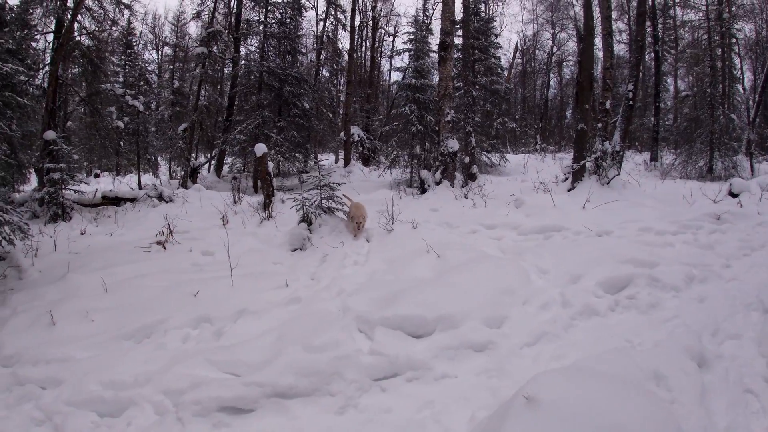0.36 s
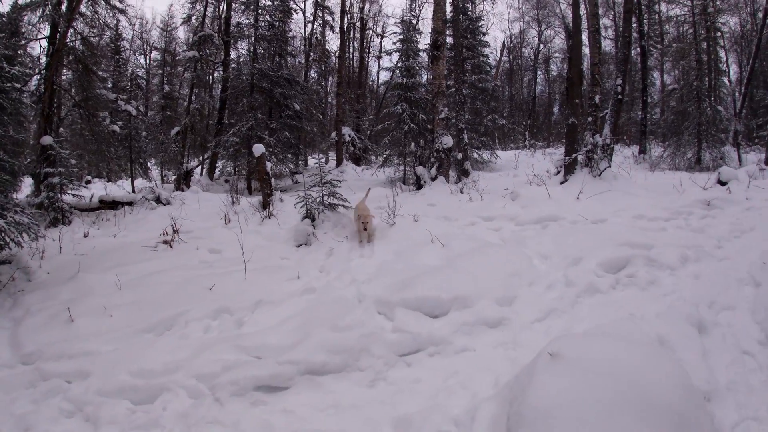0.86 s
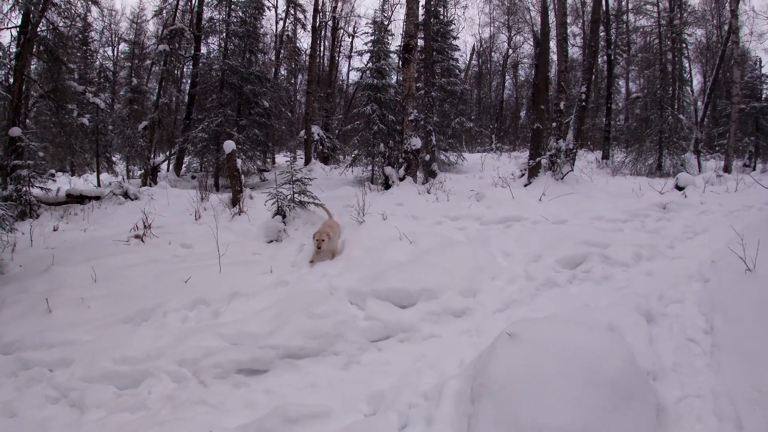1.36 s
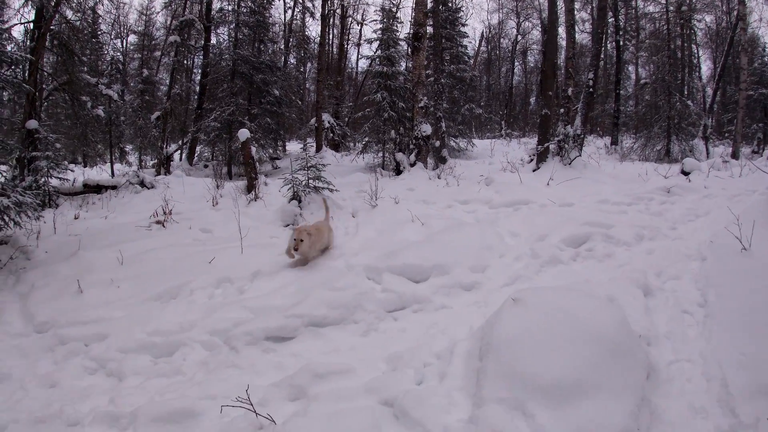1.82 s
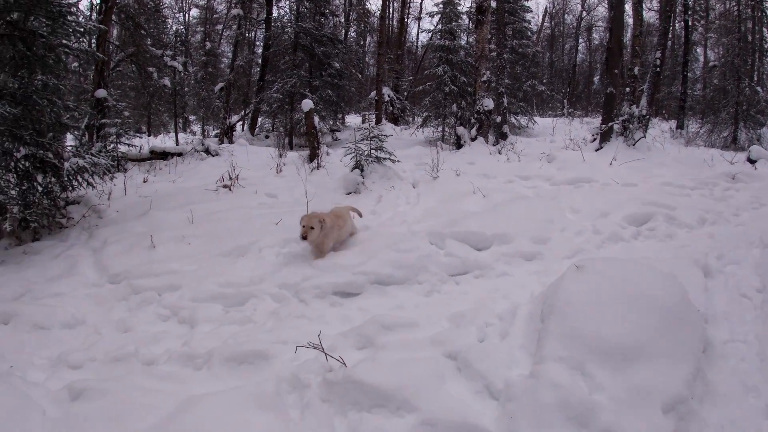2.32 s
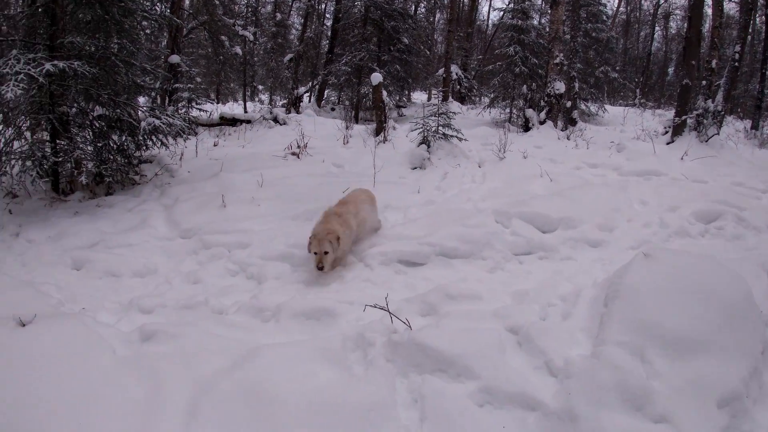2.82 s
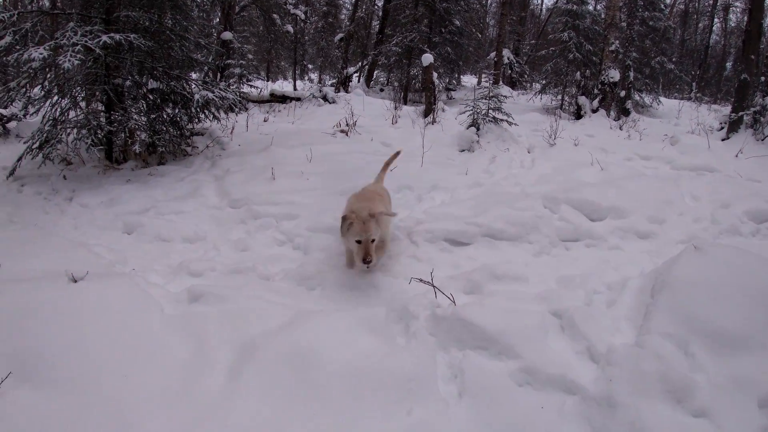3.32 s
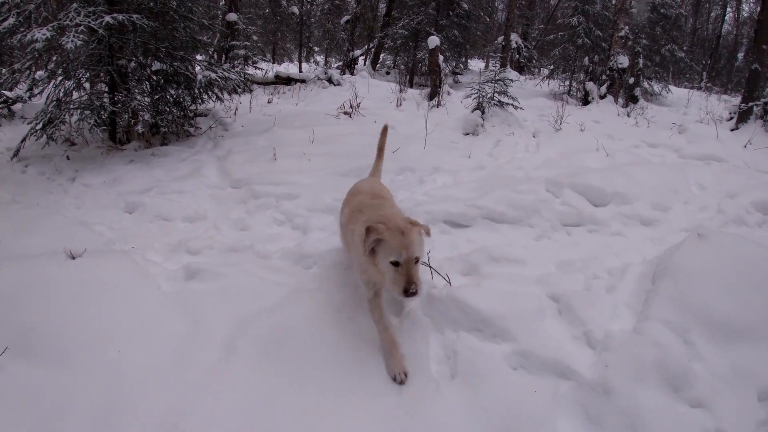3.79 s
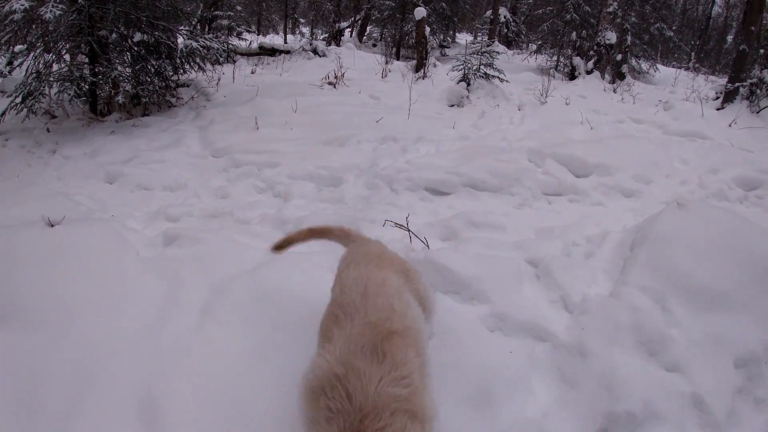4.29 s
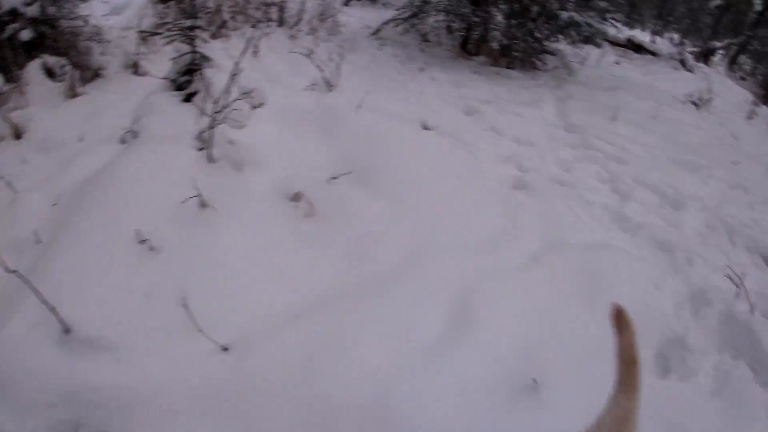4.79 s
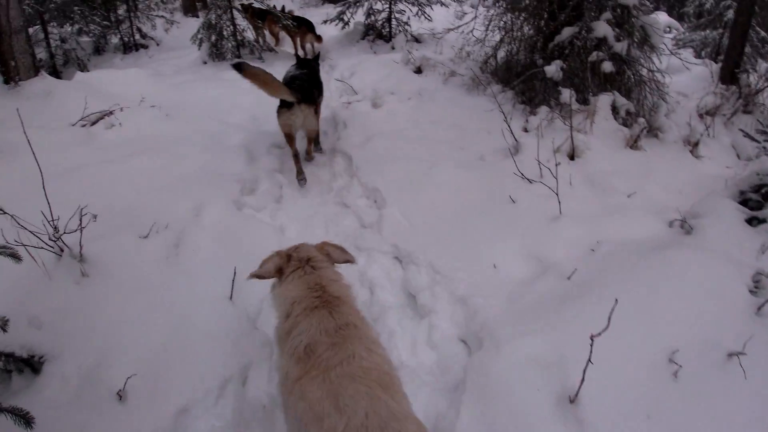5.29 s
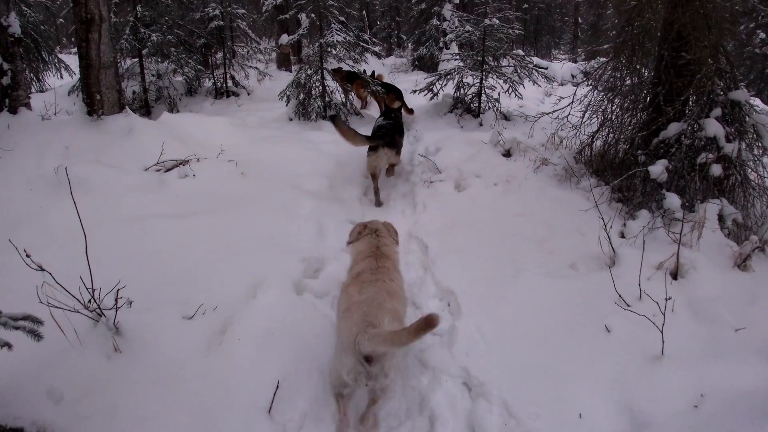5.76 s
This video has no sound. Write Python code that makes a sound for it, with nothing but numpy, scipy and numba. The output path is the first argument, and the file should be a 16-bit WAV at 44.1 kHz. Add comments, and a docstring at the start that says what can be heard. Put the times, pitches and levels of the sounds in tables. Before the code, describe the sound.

Fine snow hiss and a few crunching steps open the scene, followed quickly by two sharp yelps, the first tonal and higher, the second rising and falling. Then dogs bound through powder: gritty crunches, hollow low thuds and small crisp crackles, densest as one passes the microphone. The outdoor space is dry with barely any echo; handling jolts and soft low gusts rumble underneath.

```python
"""Snowy forest: a dog barks twice close to a hand-held camera; its collar tag ticks.
The bark is a voiced source ringing a throat; the tag is a few decaying sines.
Dogs bound through deep powder: snow hisses and crunches as shaped random grains, twigs snap,
paws and camera jolts thump as decaying sines, gusts of low noise buffet the microphone."""
import sys
import numpy as np
from scipy import signal
from scipy.fft import rfft, irfft, next_fast_len
from scipy.io import wavfile
from scipy.ndimage import uniform_filter1d
from numba import njit

SR = 44100
rng = np.random.default_rng(int(sys.argv[2]) if len(sys.argv) > 2 else 0)


def int16_out(signal):
    """Quantize to a 16-bit WAV file."""
    q = np.round(np.clip(np.atleast_2d(signal).T, -1, 1) * 32767)
    wavfile.write(sys.argv[1], SR, q.astype(np.int16))


def invert_db(level):
    """Linear amplitude ratio for a level in decibels (20 dB per decade), elementwise."""
    return 10 ** (np.asarray(level, dtype=float) / 20)


N = 259749
T = np.arange(N) / SR


def curve(table):
    """Columns of a table joined by straight lines in time."""
    s, *columns = np.transpose(table)
    return [np.interp(T, s, c) for c in columns]


def colour(x, points):
    """Shape by (f/Hz, level/dB) points, 30 dB lower beyond them; unit white noise comes out near rms 1."""
    below = (points[0][0] / 2, points[0][1] - 30)
    above = (points[-1][0] * 1.34, points[-1][1] - 30)
    hz, db = np.transpose([below] + points + [above])
    size = next_fast_len(N)
    bin_hz = np.arange(size // 2 + 1) * SR / size
    gain = invert_db(np.interp(np.log(bin_hz + 1), np.log(hz), db))
    return irfft(rfft(x, size) * gain / np.sqrt(np.mean(gain ** 2)), size)[:N]


def band(x, hz, width_hz):
    """One resonance, gain 1 at its centre."""
    return signal.lfilter(*signal.iirpeak(hz, hz / width_hz, fs=SR), x)


@njit
def glide(x, hz, width_hz):
    """State-variable band-pass whose centre moves, gain 1 at the centre."""
    y, b, l = np.empty(len(x)), 0., 0.
    for i in range(len(x)):
        g, k = np.tan(np.pi * hz[i] / SR), width_hz / hz[i]
        v = (b + g * (x[i] - l)) / (1 + g * (g + k))
        b, l, y[i] = 2 * v - b, l + 2 * g * v, k * v
    return y


def walk(rate_hz):
    """Random levels drawn every 1 / rate_hz s and slewed; spread near 1."""
    k = int(SR / rate_hz)
    return 1.25 * uniform_filter1d(np.repeat(rng.standard_normal(N // k + 1), k), k)[:N]


def grains(rate_hz, spread_db):
    """Crystals snapping: noise whose size jumps at random, now and then far up; rms 1."""
    k = max(int(SR / rate_hz), 1)
    noise = rng.standard_normal(N)
    jumps = np.minimum(rng.exponential(size=N // k + 1), 4)
    x = noise * invert_db(spread_db * np.repeat(jumps, k)[:N])
    return x / np.sqrt(np.mean(x ** 2))


def add(out, s, sound):
    """Mix a short sound in at time s."""
    i = max(int(s * SR), 0)
    out[i:i + len(sound)] += sound[:N - i]


def bark():
    """A clear fundamental; above it uneven, strong-weak pulses and a puff of air per cycle ring the throat."""
    # voice: t/s, mean pitch f/Hz, fundamental rms level/dB, overtone drive level/dB
    voice_track = [(.604, 210.6, -31.5, -43), (.618, 234, -23.5, -40.5), (.636, 450.8, -32.5, -22),
                   (.648, 500, -13.5, -28.5), (.665, 541.9, -10.5, -20), (.697, 510.8, -10, -18.5),
                   (.722, 450.8, -27, -18), (.745, 418.2, -16.5, -20.5), (.762, 391.3, -17, -30),
                   (.78, 280.9, -36.5, -39), (.815, 210.6, -35, -30.5), (.85, 218.7, -41.5, -24.5),
                   (.868, 276.7, -28, -22.5), (.888, 327.8, -23.5, -17.5), (.905, 387.7, -15, -14),
                   (.925, 419.6, -14.5, -15.5), (.946, 457.8, -13, -23), (.985, 385.5, -21.5, -23.5),
                   (1.002, 318.4, -27.5, -25.5), (1.02, 234.2, -33.5, -74.5), (1.07, 142, -55, -61)]
    # second, lower vibration of the folds in the first bark: t/s, f/Hz, rms level/dB
    undertone = [(.645, 249, -43), (.66, 262, -24), (.68, 334, -25), (.725, 412, -37)]
    # throat resonances: f/Hz before mouth factor, nominal width/Hz (scaled below), relative level/dB
    throat = [(449, 69, 7.5), (830, 148, -1.5), (1300, 350, -23.5), (1920, 110, -31)]
    # each bark: t/s of hoarsest moment, nominal roughness/0-1, half-pitch share/0-1 at the top pitch,
    # mouth opening/factor on the throat f
    manner = [(.604, 0.77, 0.2, 1.11), (.86, 0.31, 0.9, 0.97)]
    # dips of the fundamental: t/s, half length/s, depth level/dB
    voice_breaks = [(.675, .004, -20), (.713, .008, -18)]
    mouth_reset_s, settle_s, top_pitch_hz = 0.73, 0.14, 480

    hz, tone_db, db = curve(voice_track)
    which = (T >= mouth_reset_s).astype(int)
    hoarsest_s, rough, half, mouth = np.transpose(manner)[:, which]
    tone_db = tone_db + sum(d * np.exp(-((T - s) / w) ** 2) for s, w, d in voice_breaks)
    rough = np.clip(rough * (0.29 + 0.88 * np.exp(-np.abs(T - hoarsest_s) / settle_s)), 0, 1)
    half = half * np.minimum(hz / top_pitch_hz, 1) ** 2
    mouth = uniform_filter1d(mouth, size=500)
    on = np.clip(np.minimum(T - voice_track[0][0], voice_track[-1][0] - T) / 0.0056, 0, 1)

    cycles = np.cumsum(hz * (1 + 0.04 * rough * walk(200))) / SR
    pulses = sum(np.cos(2 * np.pi * k * cycles) * k ** -.3 for k in range(2, 14))
    # every other pulse is weaker; sizes also wander
    size = (1 + half * np.cos(np.pi * cycles)) * (1 + 0.52 * rough * walk(250))
    air = 7.5 * rough * (1 + np.cos(2 * np.pi * cycles)) * rng.standard_normal(N)
    source = invert_db(db) * on * (pulses * size + air)

    voice = np.zeros(N)
    for k, (f, width_hz, level_db) in enumerate(throat):
        once = glide(source, f * mouth, 1.14 * width_hz)
        voice += (-1) ** k * invert_db(level_db) * glide(once, f * mouth, 2.8 * width_hz)

    low_hz, low_db = curve(undertone)
    low_on = np.clip(np.minimum(T - undertone[0][0], undertone[-1][0] - T) / .008, 0, 1)
    low = invert_db(low_db) * np.sin(2 * np.pi * np.cumsum(low_hz) / SR) * low_on
    tone = on * invert_db(tone_db) * np.sin(2 * np.pi * cycles)
    direct = np.sqrt(2) * (voice + tone + low)

    # snow-laden trunks return a faint, short smear
    t = T[:SR // 4]
    trunks = rng.standard_normal(len(t)) * np.exp(-np.log(1000) * t / 0.35) * (t > .012)
    return direct + invert_db(-43.5) * signal.fftconvolve(direct, trunks)[:N]


def tag():
    """The metal tag's modes ring briefly at each tick."""
    # ticks: t/s, relative level/dB
    ticks = [(0.8525, -21.5), (0.8643, -29), (1.054, -31.5)]
    # modes: f/Hz, relative level/dB, t60/s
    modes = [(5930, -11, 0.029), (7580, 2.5, 0.01), (8500, -20, 0.017)]
    out, t = np.zeros(N), T[:SR // 16]
    ring = sum(invert_db(db) * np.sin(2 * np.pi * f * t) * np.exp(-np.log(1000) * t / t60) for f, db, t60 in modes)
    for s, db in ticks:
        add(out, s, invert_db(db) * 1.05 * ring)
    return out


def snow():
    """Fine and coarse grains, swelling with the ploughing and bursting while a crust gives way."""
    # dogs ploughing powder: t/s, nominal hiss level/dB, weight/dB (deep snow moved; lifts crumble, rumble)
    plough = [(0, -46, 4.5), (.16, -58.5, 7), (.35, -56.5, 8.5), (.6, -55, 10), (.7, -57, 16.5),
              (.85, -52, 11), (1.05, -56, 6), (1.25, -57.5, 15.5), (1.36, -58, 12), (1.55, -56, 2),
              (1.8, -55, 6), (2, -52.5, 5.5), (2.25, -57.5, 3), (2.7, -55, -0.5), (3.3, -52.5, -9),
              (3.38, -61.5, 0.5), (3.55, -63.5, 1.5), (3.68, -51.5, 0), (3.77, -63.5, 10), (3.85, -59, -11),
              (4.05, -54, 1), (4.5, -56.5, 12.5), (4.75, -56, -4.5), (4.96, -50.5, 6), (5.15, -59.5, 5),
              (5.45, -57.5, 5), (5.62, -55.5, -6), (5.89, -58, 17)]
    # camera turning towards the dogs: t/s, lift of the bright peak level/dB
    camera_turn = [(0, -25), (.25, -36), (.5, -15), (.95, 0.5), (1.6, 3.5), (2.4, 12.5), (3.2, 5.5),
                   (3.5, 2.5), (4.2, 7), (5.89, 8)]
    # crunches: t/s, length/s, fine-grain drive level/dB, coarse relative to fine level/dB
    crunches = [(0.004, 0.0322, -40, 1.5), (0.068, 0.028, -47, 6), (0.21, 0.014, -56.5, 10.5),
                (0.276, 0.018, -46, 3.5), (0.332, 0.057, -46.5, -4.5), (0.383, 0.022, -39, -1.5),
                (0.429, 0.017, -44, 9), (0.481, 0.01, -45, -5), (0.507, 0.012, -47, 2.5),
                (0.543, 0.069, -45.5, 8.5), (0.601, 0.02, -45, -2), (0.825, 0.065, -49.5, -16),
                (0.965, 0.013, -47.5, -13), (1.065, 0.0046, -45.5, -17), (1.122, 0.051, -50.5, 7),
                (1.183, 0.016, -55.5, 11), (1.335, 0.011, -53, 11), (1.494, 0.0039, -46, 11.5),
                (1.544, 0.069, -51.5, -9), (1.678, 0.0033, -53.5, -20.0), (1.744, 0.015, -52, 12),
                (1.772, 0.012, -49, 10), (1.825, 0.024, -46.5, -6), (1.846, 0.04, -40, 4),
                (1.889, 0.036, -46.5, 5.5), (1.949, 0.049, -46, 5.5), (2.017, 0.0054, -37.5, -6),
                (2.019, 0.11, -52, 10.5), (2.048, 0.064, -45, 3), (2.253, 0.036, -49.5, 1.5),
                (2.344, 0.1, -44, 2.5), (2.366, 0.012, -44, -10), (2.382, 0.0057, -33, -4.5),
                (2.461, 0.0088, -49, 3), (2.517, 0.0071, -43, -2), (2.618, 0.0078, -34.5, 3),
                (2.655, 0.014, -45, -3), (2.699, 0.0056, -30, -6.5), (2.704, 0.071, -46.5, -2),
                (2.924, 0.026, -37, -9.5), (2.946, 0.042, -46, -2), (2.993, 0.087, -40, -3),
                (3.129, 0.047, -48, -13), (3.133, 0.0062, -33.5, -9), (3.224, 0.015, -45.5, -1.5),
                (3.244, 0.039, -42.5, -3), (3.561, 0.004, -46, -14), (3.591, 0.0046, -43.5, -11),
                (3.614, 0.042, -44, 0), (3.644, 0.008, -36.5, 3.5), (3.857, 0.034, -48, 2),
                (3.897, 0.13, -48.5, 0.5), (3.911, 0.0034, -27.5, -0.5), (3.935, 0.044, -35, -2),
                (3.94, 0.0031, -20.5, -2), (3.984, 0.005, -29.5, -3), (3.996, 0.0061, -29, 4.5),
                (4.02, 0.055, -47.5, -1), (4.2, 0.047, -40, 1.5), (4.208, 0.0078, -25.5, -3),
                (4.255, 0.083, -48.5, 1), (4.325, 0.018, -49, 5), (4.441, 0.013, -58, -6),
                (4.443, 0.011, -39.5, 5.5), (4.503, 0.038, -41.5, -6), (4.551, 0.08, -44, 3),
                (4.574, 0.012, -36.5, 6), (4.62, 0.0095, -38.5, 11), (4.623, 0.077, -53, 7),
                (4.745, 0.046, -40, -11.5), (4.796, 0.014, -42.5, -11), (4.875, 0.05, -43.5, 1.5),
                (4.92, 0.017, -43, -2), (5.047, 0.0027, -39.5, -17), (5.12, 0.097, -50.5, -19),
                (5.156, 0.0051, -31, 2), (5.201, 0.0083, -31, 3), (5.221, 0.021, -47.5, 3),
                (5.266, 0.01, -52, 4), (5.305, 0.023, -48.5, 5), (5.349, 0.13, -48, -6.5),
                (5.396, 0.009, -44, 3), (5.449, 0.032, -46, 2.5), (5.579, 0.027, -47.5, -5),
                (5.676, 0.048, -42, 2.5), (5.688, 0.01, -31.5, -6), (5.7, 0.12, -45, 4.5),
                (5.784, 0.002, -35.5, -4), (5.834, 0.05, -41.5, 4.5)]
    # fine-grain spectrum: f/Hz, relative level/dB
    fine_spectrum = [(1800, 3), (2500, 4), (4000, 3.5), (5200, 1.5), (7000, 1), (9000, -2), (11000, -9.5),
                     (14000, -19.5), (15700, -24)]
    # coarse-grain spectrum: f/Hz, relative level/dB
    coarse_spectrum = [(300, 0), (450, 0), (800, -3), (1300, -4.5), (2000, -12), (2600, -18)]
    crack_rise_s = .0011

    (hiss_db, weight_db), (bright_db,) = curve(plough), curve(camera_turn)
    crumble_db = hiss_db + 2 + 0.52 * weight_db
    rumble_db = hiss_db + 1 + weight_db
    # power envelopes
    fine = invert_db(hiss_db + 2.1 * walk(60)) ** 2
    coarse = invert_db(crumble_db + 2.5 * walk(45)) ** 2
    # crystals let go in clusters, which shakes both sizes of grain together
    clusters = invert_db(2.6 * walk(200))
    fine, coarse = fine * clusters ** 2, coarse * clusters ** 2

    for s, length_s, db, coarse_db in crunches:
        t = T[:int((max(length_s, .003) + .02) * SR)]
        burst = (1 - np.exp(-t / crack_rise_s)) * np.exp(-t / 0.33)
        # the crust stops fast, loose crystals trickle after
        after = np.clip(t - length_s, 0, 1)
        burst = burst * (0.66 * np.exp(-after / 0.00072) + 0.19 * np.exp(-after / 0.0087))
        # a short crack is one cluster, a long one many
        burst = burst * np.resize(clusters[int(s * SR):], len(t)) ** min(length_s / 0.11, 1)
        add(fine, s, (invert_db(db) * burst) ** 2)
        add(coarse, s, (invert_db(db + coarse_db) * burst) ** 2)

    hiss = colour(np.sqrt(fine) * grains(2500, 3.22), fine_spectrum)
    # the hiss flickers in colour: four bands wander independently in level
    hiss = hiss + sum((invert_db(3.17 * walk(70)) - 1) * band(hiss, hz, 0.086 * hz)
                      for hz in (2780, 5160, 9700, 13000))
    # the camera housing lifts or shades a band near 7 kHz as it turns
    hiss = hiss + (invert_db(bright_db) - 1) * band(hiss, 7160, 1170)
    shade_db = np.minimum(bright_db, 0)
    hiss = hiss + (invert_db(.4 * shade_db) - 1) * band(hiss, 5700, 2600)
    # and, with the dogs behind it, favours the middle
    hiss = hiss + (invert_db(-.15 * shade_db) - 1) * band(hiss, 2100, 2100)

    crumble = colour(np.sqrt(coarse) * grains(900, 1.5), coarse_spectrum)
    lumps_db = 3.2 * walk(50)
    low_noise = colour(rng.standard_normal(N), [(140, 5.0), (180, 7.5), (300, 1), (420, -23.0)])
    rumble = invert_db(rumble_db + lumps_db) * low_noise
    return hiss + crumble + rumble


def paws():
    """Landings pack the snow and jolts shake the camera: short hollow thumps that sag in pitch."""
    # paw landings: t/s, relative level/dB, settled f/Hz
    landings = [(0.032, -31.5, 345), (0.071, -29, 140), (0.209, -33, 119), (0.277, -40, 183),
                (0.383, -37, 194), (0.545, -30, 196), (1.161, -30, 187.6), (1.249, -24.5, 153),
                (1.546, -35, 157), (1.747, -41, 328), (1.861, -26, 236), (2.018, -36, 360),
                (2.049, -38, 190), (2.086, -34.5, 243), (2.418, -39.5, 360), (2.622, -24, 176),
                (2.624, -27, 401), (2.698, -34.5, 178), (3.004, -35.5, 208), (3.034, -38, 332),
                (3.135, -46, 285), (3.642, -32, 176), (3.801, -43, 179), (3.858, -39, 260),
                (3.909, -34, 149), (3.953, -20.5, 177), (3.999, -16.5, 172), (4.045, -29, 160),
                (4.211, -24, 160), (4.369, -25, 184), (4.454, -27, 165), (4.579, -32, 313),
                (4.586, -26, 170), (4.615, -22, 197), (4.692, -28, 164), (4.953, -34, 142),
                (4.985, -26.5, 261), (5.025, -29, 170), (5.076, -32.5, 116), (5.152, -37, 343),
                (5.199, -29.5, 175), (5.689, -30.5, 230), (5.726, -26, 180), (5.769, -37, 172),
                (5.852, -29.5, 219), (5.874, -32, 130)]
    # jolts of the hand-held camera: t/s, relative level/dB, settled f/Hz
    jolts = [(0.616, -26, 106), (2.377, -39.5, 78), (4.216, -27.5, 55), (4.609, -21.5, 117),
             (4.989, -26, 58.5), (5.118, -31, 44.6), (5.15, -26, 49.6), (5.212, -27, 84),
             (5.239, -30.5, 60), (5.274, -36, 70)]
    paw_t60_s, jolt_t60_s = 0.063, 0.096
    out, t = np.zeros(N), T[:SR // 5]
    thumps = [(*row, paw_t60_s) for row in landings] + [(*row, jolt_t60_s) for row in jolts]
    for (s, db, hz, t60), turn in zip(thumps, rng.random((len(thumps), 1))):
        phase = 2 * np.pi * (hz * (t + 0.0011 * (1 - np.exp(-t / 0.003))) + 0.35 * turn)
        fade = (1 - np.exp(-t / 0.0013)) * np.exp(-np.log(1000) * t / t60)
        add(out, s, 1.65 * invert_db(db) * fade * (np.sin(phase) + 0.28 * np.sin(2.3 * phase)))
    return out


def twigs():
    """Brittle snaps under the snow: a few cycles that swell and die."""
    # snaps: t/s, envelope peak level/dB, f/Hz
    snaps = [(0.073, -39, 950), (0.12, -36, 2100), (0.433, -26, 1170), (2.624, -30, 1220),
             (3.001, -26, 1500), (3.035, -32, 970), (3.911, -13.5, 1730), (3.94, -28, 1080),
             (3.988, -23.5, 1080), (3.997, -29, 1110), (4.368, -32.5, 800), (5.007, -32, 1100)]
    out, t = np.zeros(N), T[:SR // 40]
    for s, db, hz in snaps:
        rise_s = 1 / hz  # one cycle
        swell = t / rise_s * np.exp(1 - t / rise_s)
        add(out, s - .001, invert_db(db) * swell * np.sin(2 * np.pi * hz * t))
    return out


def buffet():
    """Slow pressure swings of moving air on the port: each gust swells fast and dies away."""
    # gusts: peak t/s, added level/dB, decay time constant/s
    gusts = [(0, -48.5, .5), (.4, -46, 0.13), (.62, -43, 0.28), (1.2, -41.5, 0.033), (1.52, -50, .07),
             (1.85, -47, 0.099), (2.38, -47, 0.035), (2.63, -59.5, .3), (3.72, -54, 0.051), (4, -48, 0.038),
             (4.23, -33, 0.021), (4.62, -42.5, 0.094), (4.85, -51, 0.23), (5, -41.5, 0.031),
             (5.1, -43.5, 0.11), (5.17, -43, 0.091), (5.27, -47, 0.039), (5.44, -56, .05), (5.75, -51, .2)]
    rise_s, still_air_db = 0.011, -77
    size = invert_db(still_air_db)
    for s, db, decay_s in gusts:
        size = size + invert_db(db) * np.exp(np.where(T < s, (T - s) / rise_s, (s - T) / decay_s))
    return size * colour(rng.standard_normal(N), [(30, 6.5), (45, 2), (70, 7.5), (110, -9)])


def scene():
    """All sources at the one microphone."""
    return (bark() + tag() + snow() + twigs() + paws() + buffet())[None]


def top_cut(x):
    """Nothing passes above the cut-off."""
    return signal.sosfilt(signal.butter(12, 15730, fs=SR, output="sos"), x)


def record(dry):
    """The camera cuts the top with a steep low-pass."""
    low_pass = signal.ellip(8, .2, 60, 15650, fs=SR, output="sos")
    mix = signal.sosfilt(low_pass, dry)
    return top_cut(mix)


dry = scene()
out = record(dry)
int16_out(out)
```